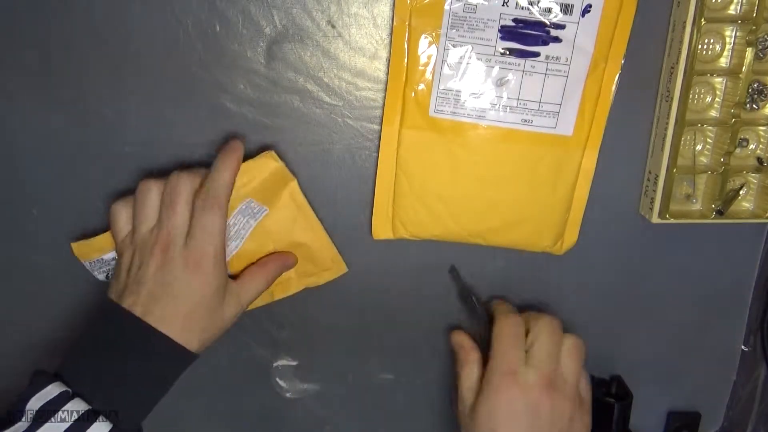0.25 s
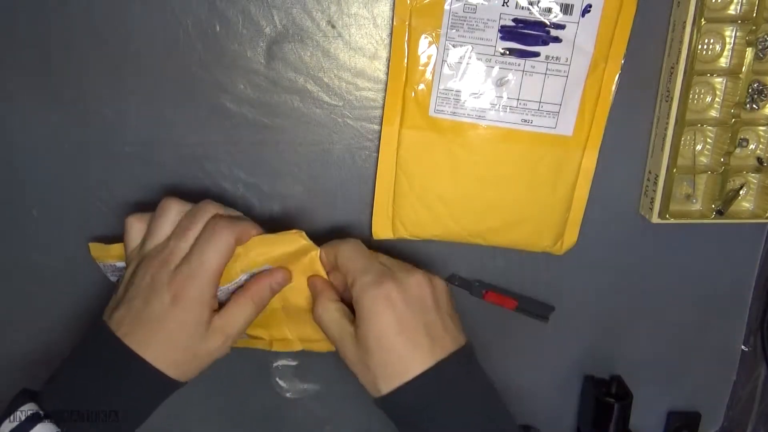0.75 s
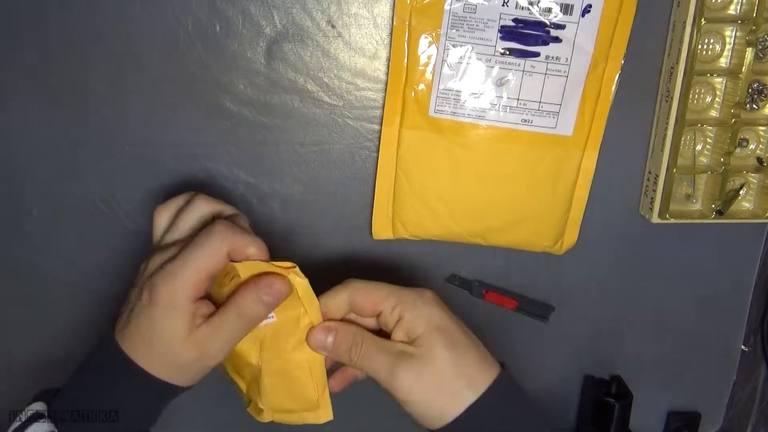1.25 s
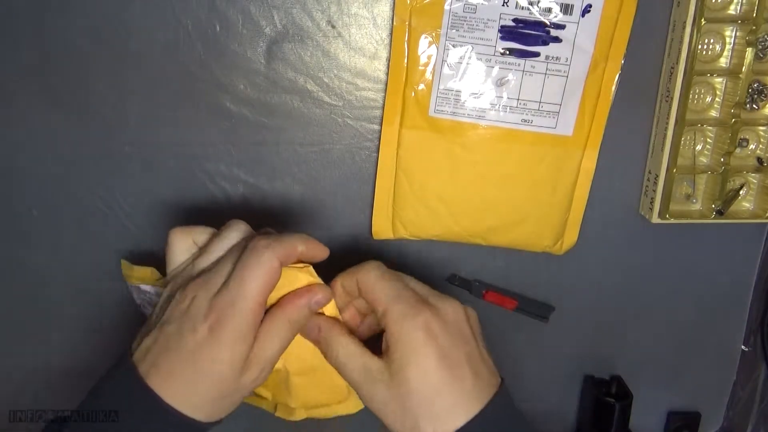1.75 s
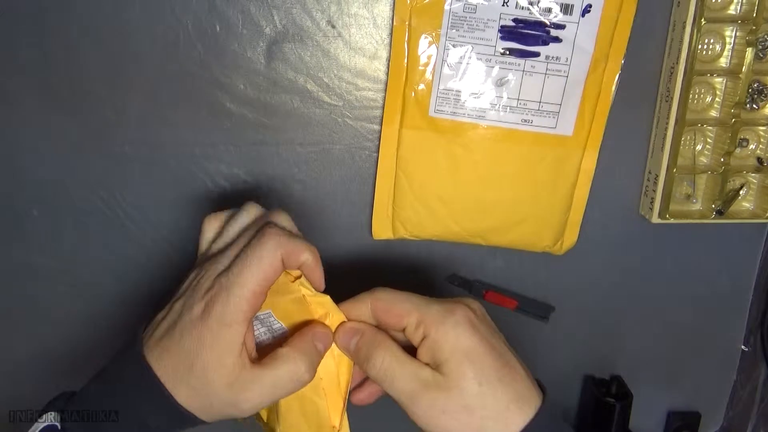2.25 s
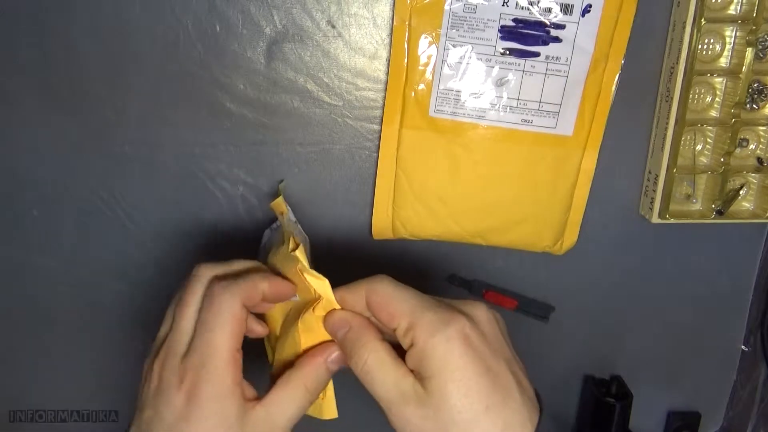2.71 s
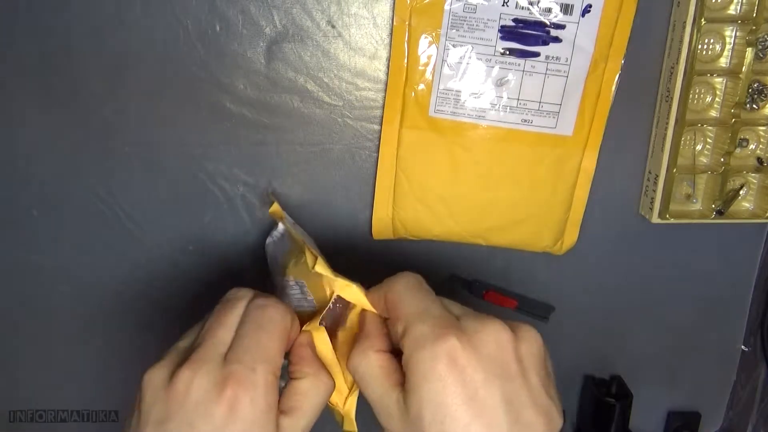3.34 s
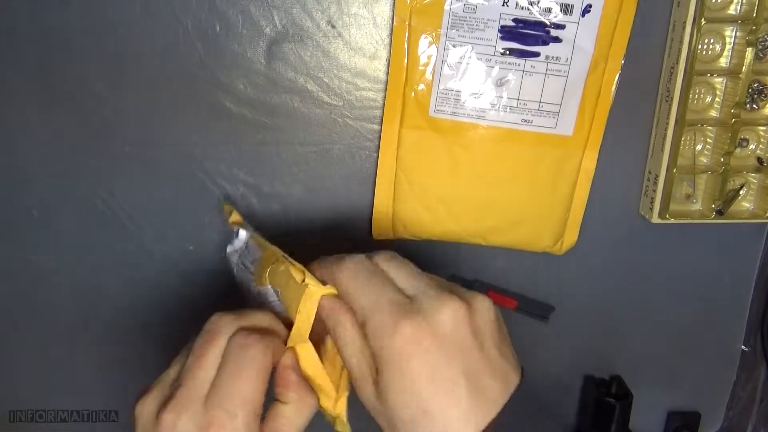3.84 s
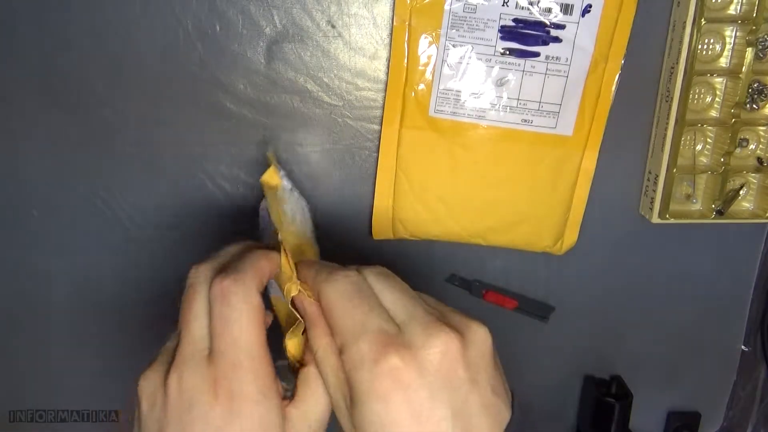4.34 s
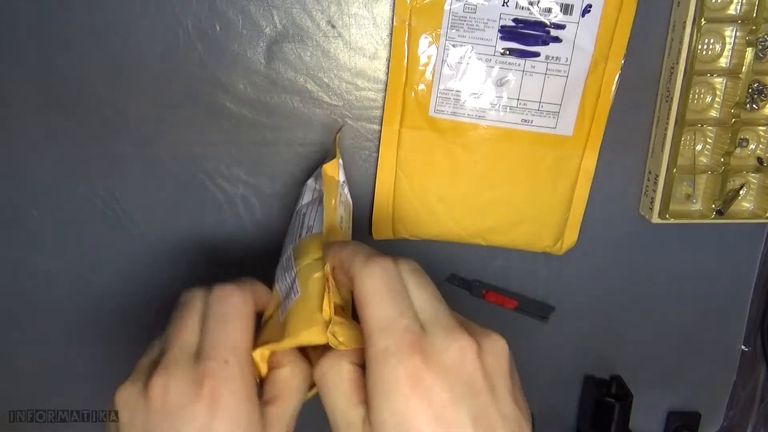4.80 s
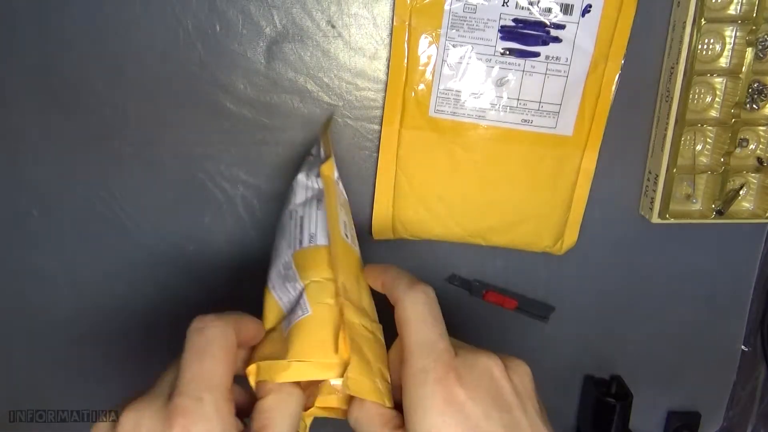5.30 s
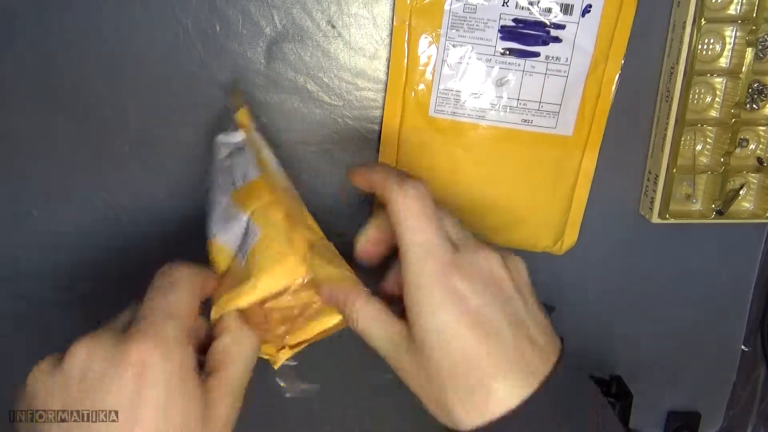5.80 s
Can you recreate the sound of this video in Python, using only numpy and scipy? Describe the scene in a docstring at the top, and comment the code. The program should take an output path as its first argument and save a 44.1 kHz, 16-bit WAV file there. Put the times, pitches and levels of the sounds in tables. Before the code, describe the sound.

In a small, quiet room, a bubble-lined paper mailer crinkles close by as hands work it open. A cluster of crisp snaps comes first, then the brief knock of a knife laid on the desk. Irregular tugs follow, mixing papery rubbing, a slightly hollow rustle and bright plastic pops, which grow busier in the second half. Faint, dull bumps come from the desk now and then.

```python
"""A padded paper envelope is pulled apart by hand on a desk.
Stick-slip friction under the fingers makes the paper, the pouch and its plastic bubble lining rustle.
Creases buckle in snaps that ring the panels and push the enclosed air; the lining pops loose in high
ticks. A knife is set down early on, and now and then a hand bears on the desk with a low thud.
A small, quiet room reverberates."""
import sys
import numpy as np
from scipy import signal
from scipy.fft import rfft, irfft, next_fast_len
from scipy.io import wavfile
from scipy.ndimage import uniform_filter1d

SR = 44100
rng = np.random.default_rng(int(sys.argv[2]) if len(sys.argv) > 2 else 0)


def store_pcm(level_fs):
    """Save levels as 16-bit WAV."""
    pcm = np.round(np.clip(level_fs, -1, 1) * 32767).astype(np.int16)
    wavfile.write(sys.argv[1], SR, np.atleast_2d(pcm).T)


N = 267157
LEAD = 256  # samples of each short sound before its peak
# crackle as the microphone hears it, dipping near 7 kHz, peaking near 12 kHz: frequency_hz, density_db
CRACKLE_COLOUR = [(3000, -19.5), (5000, -10), (6000, -8), (6800, -12), (7700, -7.5), (8600, -3),
                  (10200, -1.5), (11800, 3.5), (13000, -0.5), (14200, -8.5), (15700, -10.5)]


def amp(db):
    """Amplitude ratio of a level in decibels."""
    return 10 ** (np.asarray(db) / 20)


def unit(x):
    """Normalisation to an rms of 1."""
    return x / np.sqrt(np.mean(x ** 2) + 1e-20)


def along(points, hz):
    """Interpolation of (frequency_hz, value) points on a logarithmic frequency axis."""
    knots_hz, values = np.transpose(points)
    return np.interp(np.log(hz + 1), np.log(knots_hz + 1), values)


def filtered(x, response):
    """Linear filtering: the spectrum is multiplied by a frequency response."""
    size = next_fast_len(x.shape[-1] + 8192)
    return irfft(rfft(x, size) * response(np.fft.rfftfreq(size, 1 / SR)), size)[..., :x.shape[-1]]


def resonance(hz, centre_hz, width_hz):
    """Velocity response of a damped oscillator, 1 at resonance."""
    return 1j * hz * width_hz / (centre_hz ** 2 - hz ** 2 + 1j * hz * width_hz)


def bursts(rise_ms, fall_ms):
    """Exponential noise transients, one a row: 8 dB up per rise time, then 8 dB down per fall time."""
    ms = (np.arange(1280) - LEAD) * 1000 / SR
    span_ms = np.where(ms < 0, -np.clip(rise_ms, .1, 6)[:, None], np.clip(fall_ms, .2, 9)[:, None])
    return amp(-8 * ms / span_ms) * rng.standard_normal(span_ms.shape)


def peaked(rows, db):
    """Peak normalisation of each row to its own level."""
    return rows / np.abs(rows).max(1, keepdims=True) * amp(db)[:, None]


def placed(times, sounds):
    """Superposition of short sounds, one a row, each peaking near its time."""
    at = np.round(times * SR).astype(int)[:, None] + np.arange(sounds.shape[1])
    return np.bincount(at.ravel(), sounds.ravel(), N + sounds.shape[1])[LEAD:N + LEAD]


def gestures(start_s, length_s, level_db, swell_db, rise_db_per_s, fall_db_per_s, rest_db):
    """Power summation: the level in dB of gestures that rise, swell and fall over a resting level."""
    t = np.arange(0, N + 32, 32) / SR
    elapsed = t - start_s[:, None]
    held = np.clip(elapsed, 0, length_s[:, None])
    db = (level_db - swell_db / 2)[:, None] + (swell_db / length_s)[:, None] * held
    db = db + rise_db_per_s * np.minimum(elapsed, 0) - fall_db_per_s * np.maximum(elapsed - held, 0)
    power = amp(2 * db).sum(0) + amp(2 * rest_db)
    return np.interp(np.arange(N) / SR, t, 10 * np.log10(power))


def slips(rate_hz, spread_db, t60_s, bed):
    """Shot noise: an amplitude contour of random, exponentially decaying slips over a steady bed."""
    chance = rng.random((2, N))
    size_db = -spread_db * np.log(np.maximum(chance[1], .03))
    kicks = (chance[0] < rate_hz / SR) * amp(size_db)
    decay = amp(-60 / (t60_s * SR))
    return bed + unit(signal.lfilter([1], [1, -decay], kicks))


def patchy(spectrum, depth_db, bins=5):
    """Spectral modulation: noise of rms 1 whose colour shifts in patches of time and frequency."""
    spectra = signal.stft(rng.standard_normal(N + 512), nperseg=512)[2]
    patches = uniform_filter1d(rng.standard_normal(spectra.shape), bins, axis=0)
    patches = uniform_filter1d(patches, 8, axis=1)
    noise = signal.istft(spectra * amp(depth_db * unit(patches)), nperseg=512)[1][:N]
    return unit(filtered(noise, lambda hz: amp(along(spectrum, hz))))


def handling():
    """Common excitation: each pull raises the level contours of paper, pouch and lining together."""
    # pulls of the fingers: start_s, length_s, paper_db, pouch_db, lining_db, swell_db
    pulls = [(0, 0.21, -44.5, -53, -44.5, 2.5), (.165, 0.2, -37.5, -38.5, -41.5, -2),
             (0.369, 0.12, -45.5, -46, -55, 0), (0.578, 0.042, -43, -40.5, -61, -1),
             (0.616, 0.247, -38.5, -42.5, -37.5, -2), (.88, .24, -36.5, -41, -39, -2),
             (1.128, 0.11, -49.5, -53.5, -46, -5), (1.277, 0.1, -37, -50, -36.5, 0.5),
             (1.393, 0.15, -38, -43.5, -32.5, -1.5), (1.604, 0.063, -49, -52, -49, 2),
             (1.711, 0.22, -38, -38.5, -37, 6.5), (1.957, .065, -48, -47, -45, -8),
             (2.033, 0.083, -41, -42, -37.5, -3), (2.137, 0.08, -40.5, -45.5, -38.5, -1),
             (2.251, 0.15, -43, -50, -41, -1.5), (2.536, 0.038, -43, -52, -38, -10),
             (2.595, 0.093, -43.5, -44.5, -49.5, -10), (2.686, 0.2, -42.5, -49.5, -42, 8),
             (2.92, 0.066, -41, -47, -40.5, 4.5), (3.033, 0.092, -38, -47.5, -39, 6.5),
             (3.136, 0.069, -38, -52.5, -38, 4), (3.241, .03, -34.5, -50, -45, -5),
             (3.289, .16, -43.5, -46.5, -41, 6), (3.49, 0.027, -43, -48, -32.5, -2),
             (3.542, 0.064, -50, -51, -49, 7), (3.623, 0.079, -42.5, -45.5, -40.5, 13),
             (3.724, 0.14, -38, -53, -36.5, 3), (3.885, 0.081, -40.5, -37.5, -36.5, 2),
             (3.979, 0.14, -45.5, -49, -42, 0), (4.161, 0.039, -36.5, -39.5, -35.5, -6.5),
             (4.223, 0.078, -44.5, -42.5, -42, -12.5), (4.353, .05, -44, -52, -44, -13),
             (4.41, .03, -45, -61, -40, 3), (4.444, .13, -37.5, -42, -34, 2),
             (4.58, 0.051, -46, -51, -44, 0), (4.631, 0.14, -38.5, -48.5, -36.5, -3.5),
             (4.786, .27, -38.5, -47, -36.5, -5), (5.073, .095, -41.5, -54, -36.5, -3),
             (5.166, 0.045, -36.5, -43.5, -33, 9.5), (5.248, 0.047, -47.5, -50, -42, 8),
             (5.314, 0.1, -36.5, -40, -34.5, 7), (5.417, 0.12, -38, -34, -47.5, -10),
             (5.548, 0.15, -46.5, -48, -44.5, 1), (5.736, 0.073, -41.5, -44.5, -35.5, 1),
             (5.823, .03, -44, -46, -40, 5), (5.855, 0.056, -38, -37.5, -38, -2),
             (5.954, 0.051, -43, -44, -37, -5.5), (6.032, .05, -40.5, -42, -38, 0.5)]
    start_s, length_s, *levels, swell_db = np.transpose(pulls)
    grip_db_per_s = 1800
    release_db_per_s, rest_db = [396, 350, 600], [-56.5, -53.5, -55]  # paper, pouch, lining
    return [gestures(start_s, length_s, db, swell_db, grip_db_per_s, release, rest)
            for db, release, rest in zip(levels, release_db_per_s, rest_db)]


def rustle():
    """Stick-slip friction: dense tiny slips, their colour shifting as different panels rub."""
    # spectrum of the rubbed paper: frequency_hz, density_db
    paper_spectrum = [(590, -36), (1000, -10), (1300, -7), (1470, -5.5), (1640, -4), (1800, -5),
                      (2320, -5.5), (2570, -4), (3070, -9), (3570, -5), (4120, -7), (7500, -14.5),
                      (9750, -21), (16500, -120)]
    # spectrum of the hollow pouch: frequency_hz, density_db
    pouch_spectrum = [(160, -40), (280, -20), (394, -1.5), (515, -0.5), (693, -1), (808, -0.5),
                      (1300, -5.5), (1690, -23), (2860, -120)]
    paper_db, pouch_db, lining_db = handling()
    shared = 1.27 * slips(rate_hz=88, spread_db=-0.5, t60_s=0.028, bed=0.94)  # shakes all three
    paper = shared + slips(rate_hz=180, spread_db=5.5, t60_s=0.0072, bed=2.26)
    paper *= patchy(paper_spectrum, depth_db=2.0)
    pouch = shared + slips(rate_hz=96, spread_db=0.5, t60_s=0.011, bed=4.3)
    pouch *= patchy(pouch_spectrum, depth_db=3.0)
    lining = shared + slips(rate_hz=480, spread_db=4.5, t60_s=0.011, bed=0.9)
    lining *= patchy(CRACKLE_COLOUR, depth_db=2.0, bins=30)
    sheet = amp(paper_db - 1.6) * unit(paper) + amp(pouch_db - 2.86) * unit(pouch)
    return sheet + amp(lining_db + 0.42) * unit(lining)


def snaps_and_knocks():
    """Impulse response: creases buckle, and a knife is set down on the desk at about 0.45-0.58 s."""
    # snaps and knocks, push and edge relative: time_s, level_db, pitch_hz, push_db, edge_db, length_ms
    events = [(.0172, -30, 1290, -25, 2, 3.4), (.0489, -24, 1160, -4, 8, 1.05),
              (0.1618, -22, 1210, -17, -10, 4.7), (0.173, -12.5, 1530, -24, -29, 3.1),
              (.1841, -14, 1400, -27, -25, 1.5), (0.2448, -8.5, 1290, -24, -6, 2.5),
              (0.2847, -7, 1240, -43, -32, 0.62), (0.3058, -13.5, 1870, -20, -1, 1.2),
              (.3313, -17.5, 1480, -28, 3.5, 4.1), (0.3659, -22, 1470, -29, -6, 4),
              (0.4017, -25, 1410, -21, -21, 6.3), (.4124, -16.5, 2400, -25, -21, 0.97),
              (0.4487, -10, 2660, -30, -34, 2.5), (0.5774, -7, 2380, -29, -16, 1.9),
              (0.5925, -19, 1460, -22, -21, 2.6), (0.6185, -17.5, 1196, 0, -9, 2.8),
              (0.8663, -26, 3580, -23, -8, 1.2), (.8879, -21, 1370, -18, -17, 3),
              (0.9387, -13, 1120, -0.5, -25, 1.9), (0.9531, -25, 1290, -10, -11, 9.5),
              (.9678, -19.5, 525, -30, -1.5, 8), (1.134, -28, 3670, -23, -9, 6.3),
              (1.1907, -30, 3570, -19, -15, 2.6), (1.4878, -27.5, 890, 2, 1, 11.4),
              (1.7004, -26, 860, 1, -17, 1.2), (1.8008, -18, 1220, -11, -5, 7.5),
              (2.0313, -26.5, 965, -8, -12, 2.4), (2.0401, -23.5, 920, -8, -2, 2.9),
              (2.0733, -22.5, 960, -8, 5, 3.7), (2.0933, -16, 4900, -10, -7, 1.7),
              (2.1332, -13.5, 2020, -26, 1.5, 2.8), (2.174, -21, 1330, -12, -7, 1.9),
              (2.2066, -31, 405, -7, -12, 7.7), (2.269, -26, 3170, -13, -4, 8.9),
              (2.5279, -20, 696, -12, -5, 5.9), (2.5775, -6, 3460, -32, -17, 3.1),
              (2.5893, -15, 1060, 1.5, -19, 4.5), (2.7234, -24, 1700, -2, 0, 1.8),
              (3.1313, -21.5, 4300, -22, -1, 13), (3.23, -9, 3230, -11.5, -4.5, 2.3),
              (3.2437, -17, 3200, -22, -20, 1.1), (3.2515, -19, 3240, -7, -16, 1.1),
              (3.2812, -27, 4140, -2, -17, 3.8), (3.3082, -17.5, 2600, -20, -18, 1.9),
              (3.3343, -10, 2930, -7, -5, 1.93), (3.3777, -19, 1430, -3, -18, 5.6),
              (3.4009, -22, 3360, -10, 10, 3.9), (3.5274, -28.5, 700, -8, -16, 1.7),
              (3.6141, -26.5, 1490, -2.5, -24, 1.7), (3.6849, -21, 2380, -3, -17, 9.5),
              (3.6976, -16.5, 2300, -8, -14, 2.4), (3.829, -16.5, 1090, -27, 0.5, 4.5),
              (3.9146, -23, 730, -19, -12, 3.4), (3.947, -21, 1260, -23, -1, 2.4),
              (4.1588, -16.5, 4260, -9, -21, 6.4), (4.159, -23.5, 1720, -7, -20, 4.5),
              (4.2258, -23.5, 1150, 1, -6, 1.3), (4.4682, -26.5, 1610, -18, 9, 7.8),
              (4.544, -20, 1380, -4, -13, 2.1), (4.8839, -30, 2550, 1, -13, 1.3),
              (5.0927, -29, 2630, -13, -9, 5.1), (5.1485, -26, 460, -10, 0, 3.9),
              (5.1809, -15, 1220, -4, -25, 2.1), (5.3143, -12, 2580, -3, 2, 2.7),
              (5.3445, -18.5, 714, -3, -20, 1.1), (5.3729, -18.5, 855, -7, 5, 2.4),
              (5.3815, -28.5, 660, 4, 11, 18), (5.4077, -10.5, 2570, -11, -13, 3.2),
              (5.4185, -8, 670, -36, -0.5, 2.5), (5.4346, -22, 690, -18, -9, 6.9),
              (5.868, -24, 1020, 0, -4, 7.4), (5.9015, -22, 3600, -22, -8, 1.5)]
    # modes of the envelope, common to all events: centre_hz, width_hz, gain_db
    panel_modes = [(680, 280, 3), (1335, 446, 12), (1820, 980, 4), (2575, 400, 9), (3470, 360, 0.5),
                   (4420, 370, -1)]
    # resonance of the pouch air as the grip changes its shape: time_s, pitch_hz
    cavity = [(0, 755), (.35, 830), (.6, 525), (1, 555), (1.5, 410), (1.8, 700), (2.1, 517), (2.6, 404),
              (2.72, 820), (3.3, 824), (3.34, 550), (3.69, 680), (4.2, 476), (4.55, 730), (4.9, 410),
              (5.15, 390), (5.19, 890), (5.36, 520), (5.9, 630)]
    time_s, level_db, pitch_hz, push_db, edge_db, length_ms = np.transpose(events)
    pitch_hz = pitch_hz[:, None]
    cavity_hz = np.interp(time_s, *np.transpose(cavity))[:, None]
    force = bursts(.15 * length_ms, .5 * length_ms)
    force += .12 * bursts(.2 * length_ms, 2 * length_ms)  # the rattle after it
    force[:, LEAD - 18] -= 16 / length_ms  # a quick event is mostly one clean jolt
    drive = amp(rng.normal(0, 3, (len(time_s), len(panel_modes))))  # modes are driven unevenly

    def panel_response(hz):
        """Modal superposition: the event's own ring and the common modes, in a band about its pitch."""
        ring = resonance(hz, pitch_hz, .12 * pitch_hz)
        modes = sum((-1) ** k * drive[:, [k]] * amp(gain_db) * resonance(hz, centre_hz, width_hz)
                    for k, (centre_hz, width_hz, gain_db) in enumerate(panel_modes))
        body = resonance(hz, 1.2 * pitch_hz, 2.2 * pitch_hz)
        return (ring + 0.19 * modes + 0.17) * body ** 2

    panel = filtered(force, panel_response)
    push = filtered(force, lambda hz: resonance(hz, cavity_hz, 113) * resonance(hz, cavity_hz, 360))
    crack = bursts(0.18 * length_ms, 0.38 * length_ms)
    edge = filtered(crack, lambda hz: resonance(hz, 4740, 2800) ** 2)
    snaps = peaked(panel, level_db - .6) + peaked(push, level_db + push_db - 10.5)
    return placed(time_s, snaps + peaked(edge, level_db + edge_db - 2.5))


def stray_pops(lining_db, count=38):
    """A random point process of small pops that follow the rubbing: time_s, level_db, fall_ms."""
    chance = rng.random((count, 2))
    at = (chance[:, 0] * (N - 1)).astype(int)
    level_db = lining_db[at] + 13 - 1.5 * np.log(1 - chance[:, 1])
    return np.transpose([at / SR, level_db, np.full(count, 0.58)])


def ticks():
    """Impulsive excitation: plastic film pops loose in treble bursts, brighter or duller each time."""
    # pops of the lining: time_s, level_db, fall_ms
    pops = [(.0486, -8, 1.8), (.1615, -18, 1.2), (.1816, -13, .75), (.2443, -10, 0.73), (.307, -14, 2.1),
            (.3307, -13, 1.5), (.5145, -31, 1.5), (.61, -13, 6), (.8663, -16, .5), (.939, -14, .5),
            (.966, -6.5, 0.38), (1.1349, -15, .65), (1.1902, -9, 1.3), (1.3455, -18, .65),
            (1.5493, -20, .44), (1.5606, -15, 0.66), (1.608, -24, .8), (1.6655, -13.5, 0.72),
            (1.7087, -23, .6), (1.9918, -19, .39), (2.088, -21, .61), (2.0931, -2, 0.3), (2.1023, -18, .45),
            (2.1113, -6, .6), (2.134, -3.5, 0.34), (2.142, -8, 0.45), (2.4116, -18.5, 4.4),
            (2.5287, -17, 6.2), (2.5604, -12, 0.44), (2.8725, -17.5, 3.7), (3.1868, -9.5, 0.75),
            (3.1946, -8, .5), (3.2018, -16, 0.65), (3.2302, -15.5, .5), (3.284, -12, 0.56),
            (3.2965, -9.5, 0.51), (3.333, -10, 2), (3.3766, -12, 0.9), (3.4007, -6, 4.4),
            (3.4467, -21, 2.9), (3.4943, -17, .8), (3.502, -15.5, 9), (3.585, -24, .38),
            (3.6487, -14.5, .91), (3.678, -16, .5), (3.6935, -8, 3), (3.711, -7, 0.7), (3.8265, -9, 0.45),
            (3.8384, -16, 3.6), (3.8593, -20, .58), (3.8783, -15, .9), (3.8899, -9, .9), (3.8996, -3, 0.52),
            (3.9128, -4, 4.1), (3.9202, -9, .8), (3.946, -17.5, 1.5), (4.0953, -15, .5),
            (4.1183, -15, 0.53), (4.1282, -24, .9), (4.2, -21, 1.2), (4.259, -12, 1.2), (4.2693, -27, 1.2),
            (4.359, -22.5, 8), (4.452, -9, 2.2), (4.5429, -17, 1.6), (4.7992, -16.5, 11), (5.022, -10, 1.1),
            (5.113, -12.5, .4), (5.1294, -18, 3), (5.193, -16, .99), (5.2146, -14.5, 6.9), (5.3148, -7, .6),
            (5.3348, -14, .5), (5.3581, -7, .6), (5.3644, -14, 5.8), (5.372, -9, 0.88), (5.376, -5, 3.2),
            (5.406, -7, .76), (5.418, -9, 0.83), (5.5322, -23, .5), (5.5672, -18, .95), (5.5838, -20, 1.6),
            (5.636, -21, .46), (5.655, -16.5, 1), (5.8676, -15, .7), (5.874, -12, 1), (5.8818, -14, 0.48),
            (5.8894, -18, .5), (5.9013, -7.5, .6)]
    lining_db = handling()[2]
    time_s, level_db, fall_ms = np.vstack([pops, stray_pops(lining_db)]).T
    rise_ms = 0.15 + 0.3 * fall_ms
    burst = bursts(0.85 * rise_ms, 0.88 * fall_ms)
    burst += 0.038 * bursts(rise_ms, fall_ms + 5)  # a weak afterquiver
    burst[:, LEAD] += 1.3 / (rise_ms + fall_ms)  # the shortest pops are one clean jolt
    tilt_db = rng.normal(3.0, 3.7, (len(time_s), 1))
    colour = lambda hz: amp(along(CRACKLE_COLOUR, hz) + tilt_db * np.log2((hz + 2000) / 12000))
    return placed(time_s, peaked(filtered(burst, colour), level_db - .6))


def desk_thuds():
    """Forced vibration: the desk's low noise swells into a thud whenever a hand bears down."""
    # presses of a hand: start_s, level_db
    presses = [(.34, -44), (.64, -49.5), (.93, -55), (1.86, -52.5), (2.2, -57.5), (2.53, -53), (2.6, -51),
               (3.28, -57.5), (3.43, -59), (3.7, -64), (3.82, -56), (4.2, -57.5), (4.9, -56), (5.16, -55),
               (5.29, -56), (5.875, -46.5), (6.05, -57)]
    # spectrum of the desk: frequency_hz, density_db
    desk_spectrum = [(35, -48), (60, -26), (97, 1.5), (145, -5.5), (188, -1), (320, 2), (420, -28),
                     (700, -120)]
    start_s, level_db = np.transpose(presses)
    desk_db = gestures(start_s, np.full_like(start_s, .01), level_db, swell_db=0,
                       rise_db_per_s=400, fall_db_per_s=157, rest_db=-65)
    desk = slips(rate_hz=23, spread_db=3.0, t60_s=0.053, bed=1.13) * patchy(desk_spectrum, depth_db=2.5)
    return amp(desk_db - 1.0) * unit(desk)


def reverberation(x):
    """Diffuse reverberation: two uncorrelated tails, each frequency decaying at its own rate."""
    # reverberation time of the room: frequency_hz, t60_s
    decay_times = [(300, 0.27), (2000, 0.28), (6000, 0.024), (14000, 0.098)]
    hz, t, spectra = signal.stft(rng.standard_normal((2, SR // 3)), SR, nperseg=128)
    decay = amp(-60 * t / along(decay_times, hz)[:, None])
    tails = signal.istft(spectra * decay, SR, nperseg=128)[1]
    return signal.fftconvolve(x[None], tails / np.linalg.norm(tails[0]), axes=1)[:, :N]


def room_tone():
    """Ambient noise: the nearly steady broadband hush of the room."""
    # spectrum of the room tone: frequency_hz, density_db
    tone_spectrum = [(25, -29), (87, -12), (250, 0), (400, 5), (1100, 10), (4500, -2.5), (7500, -6),
                     (12500, -29), (15800, -25)]
    return patchy(tone_spectrum, depth_db=-0.5)


def scattered(x):
    """Scattering: moving hands vary the small difference between the paths to the two channels."""
    # stereo width, side relative to mid: frequency_hz, side_db
    width = [(40, -19), (100, -25), (300, -47.5), (1000, -17), (2500, -22), (5000, -17.5), (9000, -16.5),
             (12500, -36), (15000, -55)]
    hz, _, spectra = signal.stft(x, SR, nperseg=256)
    drift = uniform_filter1d(rng.standard_normal(spectra.shape), 3, axis=0)
    phase = 3 * unit(uniform_filter1d(drift, 6, axis=1))
    side_gain = amp(along(width, hz) + 4.5)[:, None]
    return signal.istft(spectra * np.exp(1j * phase) * side_gain, SR, nperseg=256)[1][:N]


def scene():
    """Mid-side stereo: the direct sound is nearly central; echo and room tone come from all round."""
    direct = rustle() + desk_thuds() + snaps_and_knocks() + ticks()
    mid_echo, side_echo = reverberation(direct)
    mid = direct + amp(-13) * mid_echo + amp(-58.5) * room_tone()
    side = scattered(direct) + amp(-27.5) * side_echo + amp(-59) * room_tone()
    return np.array([mid + side, mid - side]) * amp([[-.2], [.2]])


def record(dry):
    """Band limiting: deep bass rolls off, treble stops at 15.9 kHz, and a faint rumble lies beneath."""
    bass_hz, top_hz = 90, 15900
    noise = rng.standard_normal(N) + .4 * rng.standard_normal(dry.shape)
    rumble = filtered(noise, lambda hz: amp(-59) * resonance(hz, 32, 25))
    passband = lambda hz: (1j * hz / (bass_hz + 1j * hz)) ** 2 * (hz < top_hz)
    return filtered(dry, passband) + filtered(rumble, lambda hz: hz < top_hz)


dry = scene()
out = record(dry)
store_pcm(out)
```